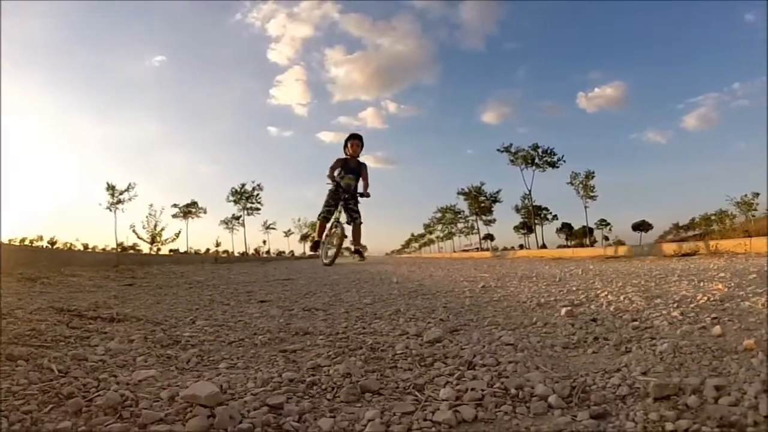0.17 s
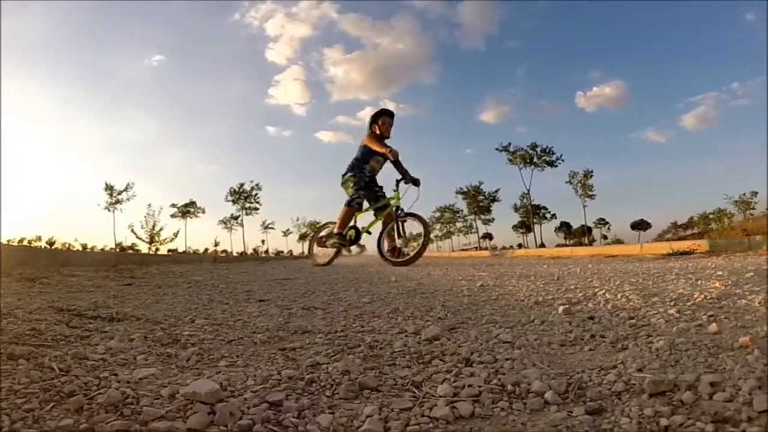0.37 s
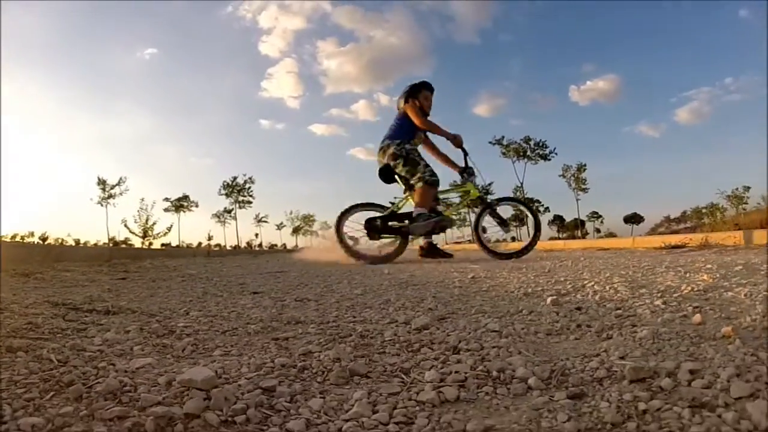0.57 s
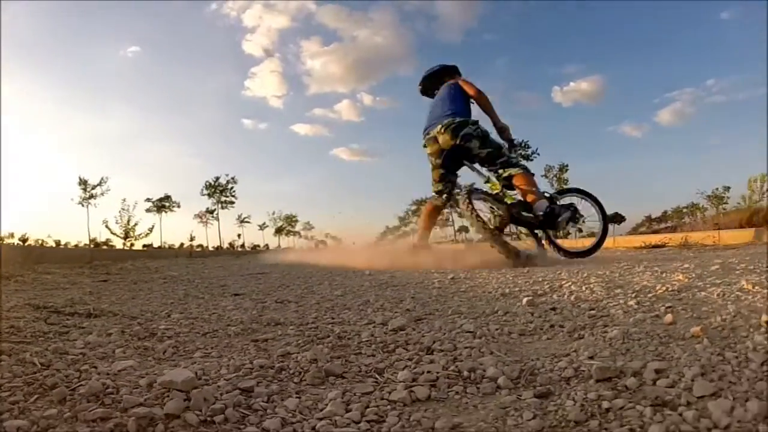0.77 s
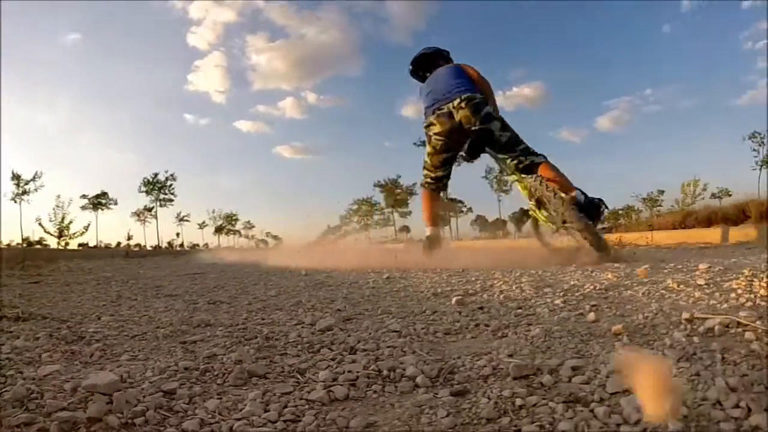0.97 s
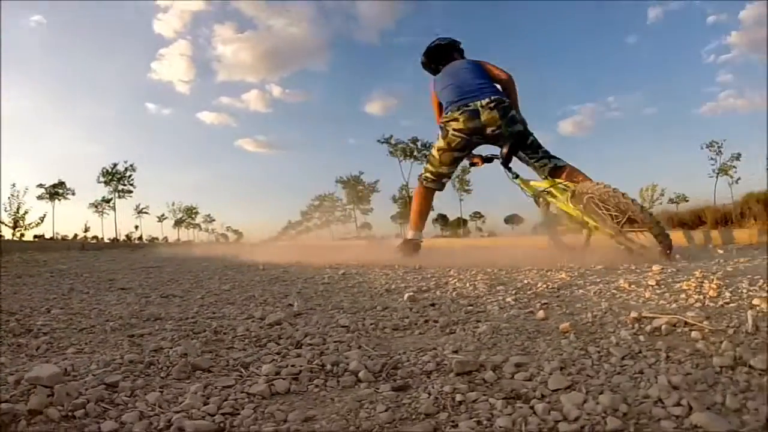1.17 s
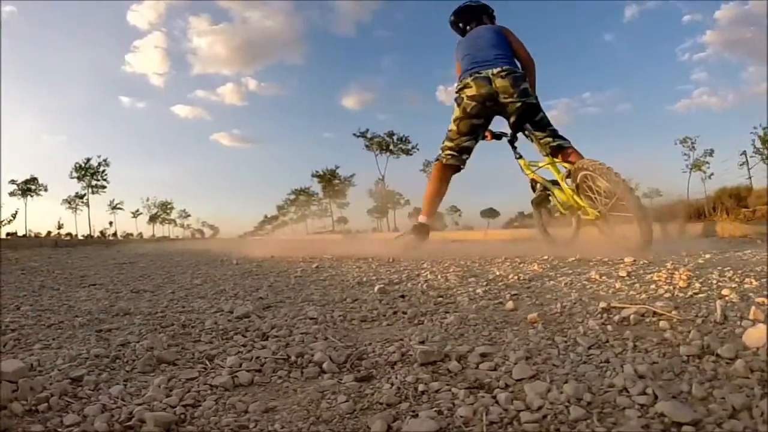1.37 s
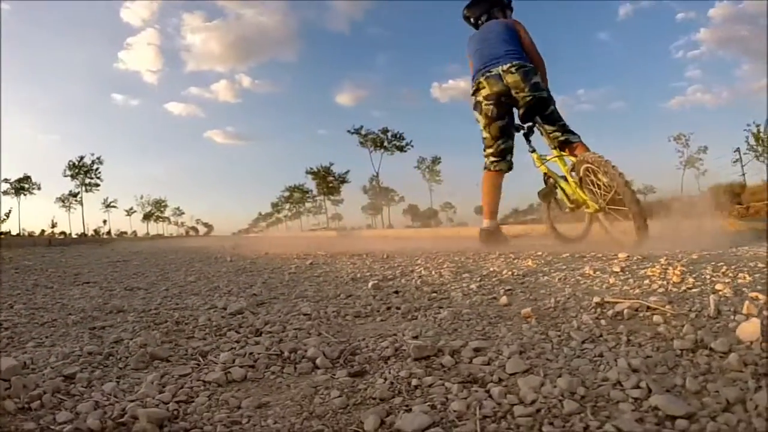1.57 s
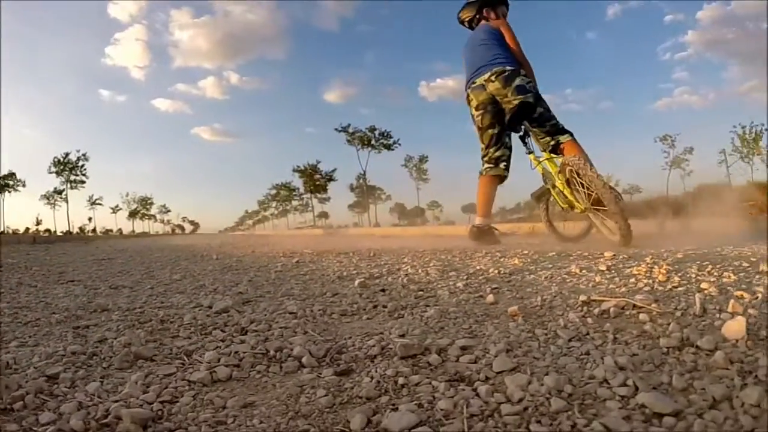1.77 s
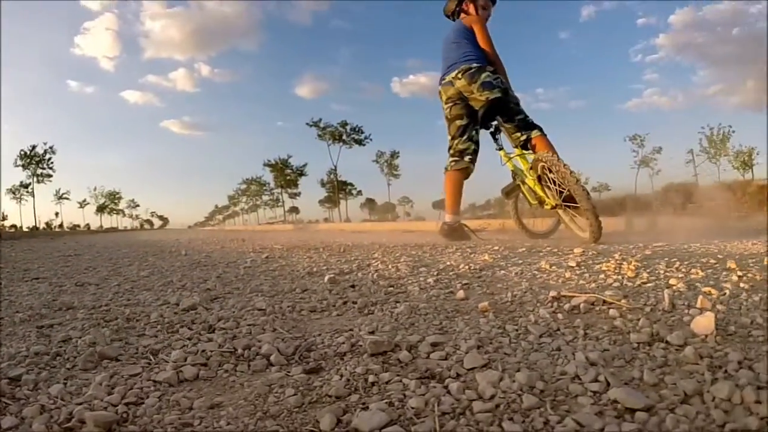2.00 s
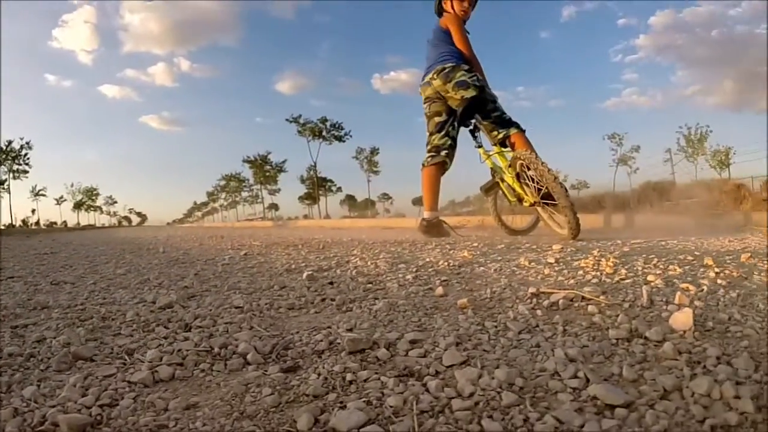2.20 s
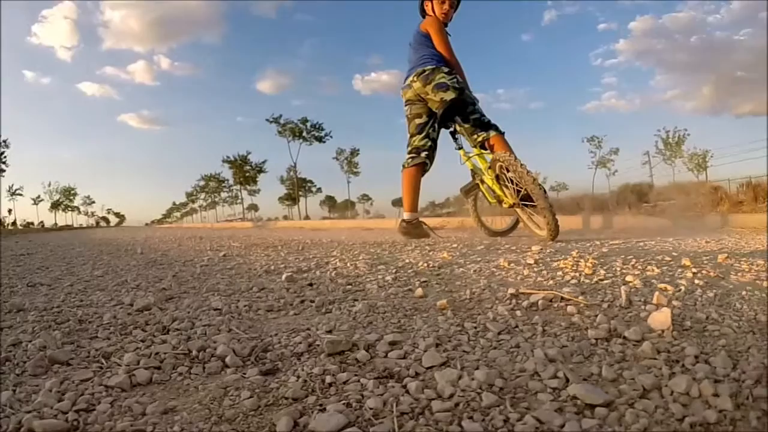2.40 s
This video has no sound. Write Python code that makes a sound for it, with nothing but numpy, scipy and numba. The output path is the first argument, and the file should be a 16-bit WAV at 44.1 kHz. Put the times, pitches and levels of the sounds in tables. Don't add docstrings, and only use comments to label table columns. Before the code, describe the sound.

A bicycle's rear tyre slides across loose gravel outdoors, with a dense, surging crunch of stones and grit; two stones crack against the boxed microphone on the ground, then sparse pebbles settle over low wind.

```python
import sys
import numpy as np
from scipy import signal
from scipy.fft import rfft, irfft
from scipy.io import wavfile
from scipy.ndimage import uniform_filter1d
from numba import njit

SR = 44100
rng = np.random.default_rng(int(sys.argv[2]) if len(sys.argv) > 2 else 0)


def to_wav(sig):
    pcm = np.clip(np.atleast_2d(sig), -1, 1) * 32767
    pcm = np.round(pcm).astype(np.int16)
    wavfile.write(sys.argv[1], SR, pcm.T)


def boost(x):
    u = np.asarray(x, float) / 20
    return 10 ** u


N = 108045


def unit(x):
    return x / np.sqrt(np.mean(x ** 2))


def colour(x, points):
    hz, db = np.array(points, float).T
    grid_hz = np.maximum(np.fft.rfftfreq(8192, 1 / SR), 1)
    cepstrum = irfft(np.log(boost(np.interp(np.log(grid_hz), np.log(hz), db))))
    cepstrum[1:4096] *= 2
    cepstrum[4097:] = 0
    impulse = irfft(np.exp(rfft(cepstrum)))[:4096]
    return signal.fftconvolve(x, impulse)[:len(x)]


def ring(x, hz, width_hz):
    return signal.lfilter(*signal.iirpeak(hz, hz / width_hz, fs=SR), x)


def high_pass(x, order, hz):
    return signal.sosfilt(signal.butter(order, hz, "high", fs=SR, output="sos"), x)


@njit
def grains(n, start, turn, fade, size):
    out = np.zeros(n)
    for k in range(len(start)):
        z, p, i = size[k] + 0j, fade[k] * np.exp(1j * turn[k]), start[k]
        while i < n and abs(z) > .003 * abs(size[k]):
            out[i] += z.imag
            z *= p
            i += 1
    return out


def knocks(start_s, hz, cycles, size):
    first = (start_s * SR).astype(np.int64)
    return grains(N, first, 2 * np.pi * hz / SR, np.exp(-hz / cycles / SR), 1. * size)


def shower(busy, per_s, lo_hz, hi_hz, cycles, spread_db):
    most = 12000
    place, pitch, luck, sign, chance = rng.random((most, 5)).T
    share = busy[(place * N).astype(int)]
    hz = lo_hz * (hi_hz / lo_hz) ** pitch
    size = boost(-spread_db * np.log(luck + .02)) * np.sign(sign - .5)
    size = size * (np.arange(most) < per_s * N / SR)
    size = size * (chance < share) / np.sqrt(share)
    return unit(knocks(place * N / SR, hz, cycles, size))


def walk(rate_hz):
    k = int(SR / rate_hz)
    return unit(uniform_filter1d(uniform_filter1d(rng.standard_normal(N), k), k))


# pitch in Hz, width in Hz, level in dB.
CASE_RESONANCES = [(321.4, 97, -5.5), (597, 88, 1), (782, 130, 0), (1015, 87, 2.5), (1254, 74, -4.5),
                   (2027, 520, -8), (2951, 176, -4.5), (4050, 576, -27), (5400, 770, -36)]
# frequency in Hz, gain in dB.
CASE_LEAK = [(100, -21), (250, -19), (3000, -27), (5000, -36.5), (7000, -58), (10000, -44), (14000, -51.5)]


def through_case(x):
    out = colour(x, CASE_LEAK)
    for k, (hz, width_hz, db) in enumerate(CASE_RESONANCES):
        out = out + (-1) ** k * boost(db) * ring(x, hz, width_hz)
    return out


# peak in seconds, stone surge in dB, grit surge in dB, fade in seconds.
CRUNCHES = [(0.097, -6, 2.5, 0.005), (0.153, 4.5, 1, 0.011), (0.246, 7.5, 12.5, 0.014),
            (.289, 4, 10.5, 0.013), (.313, 4, 2.5, 0.013), (0.356, 4, 7.5, .015), (0.377, 5, 1, 0.014),
            (0.423, 4.5, 1.5, 0.011), (0.446, 8, 3.5, 0.021), (.495, 4.5, 6.5, 0.0088),
            (0.531, -2.5, 5, 0.02), (.558, 4.5, 1.5, 0.0068), (.581, 8, 3.5, 0.016), (0.6, 3.5, 4, 0.02),
            (.634, 10, 5, 0.013), (.664, -9, 3, 0.0072), (0.687, 3, 7.5, 0.014), (0.72, -1, 5, 0.0075),
            (0.73, 6.5, 1.5, 0.022), (0.773, 3, 4.5, 0.0091), (0.781, 8, 2, 0.0082),
            (0.808, -0.5, 6.5, .008), (0.816, 3, 0, 0.013), (0.901, -2, 5.5, .01), (0.913, 6, 3.5, 0.013),
            (1, 4, -6, 0.0062), (1.032, 3, 0.5, 0.022), (1.107, 5, -4, .01), (1.136, 9, 2, 0.0093),
            (1.149, 7, 5.5, 0.01), (1.203, 0, 4, 0.0071), (1.278, 5, 6.5, .012), (1.353, 7, 8, .01),
            (1.403, 5, 9, .008), (1.413, 8.5, 13, 0.011), (1.4194, 19.5, 13, .012), (1.468, 5, 7.5, 0.0057),
            (1.536, 3, 10.5, 0.018), (1.583, 6.5, 2.5, 0.0085), (1.607, 6, -1, .01),
            (1.633, 4, 8.5, 0.0093), (1.647, 11, 3, 0.014), (1.677, -7, 8, .015), (1.703, 2, 9, 0.0065),
            (1.722, 13, 9, 0.04), (1.765, 3, 9, .015), (1.795, 2, 10, .01)]


def surge(t, column):
    rise_s, lift_db = .002, 0
    for crunch in CRUNCHES:
        since_s = t - crunch[0]
        rise = np.clip(since_s / rise_s + 1, 0, 1)
        lift_db = lift_db + crunch[column] * rise * np.exp(-np.clip(since_s, 0, None) / crunch[3])
    return lift_db


# time in seconds, level in dB, grit share in dB, tyre weight in dB,
# sand spray in dB.
SKID = [(0, -38.5, 4, -17, 6), (.19, -38, 4, 7.5, 4), (.245, -27, -8.5, -2, -17), (0.332, -27.5, 3.5, 8, 1),
        (0.388, -18, 0, 3, -1.5), (.55, -18, 6.5, 2, 6.5), (.7, -14, 0, 5, 2), (0.828, -21, 4.5, 8, 8.5),
        (0.923, -23, -4, 4.5, 4.5), (0.943, -45, 17, -15, -3), (0.981, -29, -1, 2.5, 6),
        (1.23, -37, 6, -5, 10.5), (1.3, -53, 7.5, -6.5, 16.5), (1.49, -68, -0.5, 11.5, 16.5),
        (1.529, -50, -1, -10.5, 10.5), (1.655, -40.5, 3.5, 2, 13), (1.72, -50, 5, 10, 13),
        (1.82, -65, -0.5, 0, 14)]
# frequency in Hz, gain in dB.
SAND_COLOUR = [(2200, -21.5), (3300, 1.5), (4150, -7), (4500, -16), (5200, -10.5), (7000, -21.5),
               (10000, -32.5)]


def skid(t):
    rows = np.array(SKID, float)
    level_db, grit_db, weight_db, spray_db = (np.interp(t, rows[:, 0], col) for col in rows.T[1:])
    end_s, end_db = rows[-1, :2]
    level_db = np.where(t > end_s, end_db - 60 * (t - end_s), level_db)
    sparse_below_db, sparse_slope, slide_ends_s = -26, .6, 1.2
    fewest = np.where(t < slide_ends_s, .5, .4)
    busy = np.clip(boost(sparse_slope * (level_db - sparse_below_db)), fewest, 1)
    stone_surge_db, grit_surge_db = surge(t, column=1), surge(t, column=2)

    stones = shower(busy, 1600, lo_hz=472.4, hi_hz=1500, cycles=0.93, spread_db=1.5)
    grit = shower(busy, 2500, lo_hz=1500, hi_hz=14200, cycles=0.33, spread_db=1.3)
    thud = shower(busy, 300, lo_hz=200, hi_hz=450, cycles=0.28, spread_db=4.5)
    ground = ring(shower(busy, 90, lo_hz=90, hi_hz=180, cycles=.75, spread_db=2), 130, 110)
    sand = colour(shower(busy, 3000, lo_hz=3000, hi_hz=15000, cycles=.45, spread_db=3.0), SAND_COLOUR)
    hiss = colour(rng.standard_normal(N), [(4000, -19.0), (8000, 4.5), (15000, -0.5)])

    body = boost(stone_surge_db) * unit(through_case(stones))
    body = body + boost(-4.5 + grit_db + grit_surge_db) * unit(through_case(grit))
    body = body + boost(-10.5 + weight_db + stone_surge_db / 2) * unit(through_case(thud))
    body = body + boost(-19 + weight_db) * ground
    body = body + boost(-26.5 + spray_db + grit_surge_db) * unit(sand)
    body = body + boost(-45.5 + weight_db + grit_surge_db) * hiss
    settle_db, wander_db = -2.5, 0.45
    return high_pass(body * boost(level_db + settle_db + wander_db * walk(45)), 3, 85)


# landing in seconds, peak in dB, pitch in Hz, brightness in dB.
PEBBLES = [(.0275, -24, 930, -14.5), (.0508, -20.5, 950, 3), (.2006, -5.5, 1020, -15),
           (.2293, -5, 825, -17), (.4955, 0, 880, -14), (.559, -2, 726, -2), (.8815, 3, 794, -33),
           (1.151, -14, 780, -11), (1.2158, -11, 670, -16), (1.2945, -24.5, 829, -13),
           (1.3185, -22.5, 635, -21), (1.3385, -31, 656, -24), (1.393, -39, 568, -8),
           (1.4245, -36, 450, -10), (1.5128, -21, 680, -22), (1.585, -34, 641, -12),
           (1.6315, -24, 824, -16), (1.6535, -16, 770, -27), (1.7225, -26.5, 674, -10),
           (2.0175, -29.5, 1000, -22), (2.1815, -34, 617, -24), (2.3205, -33, 720, -8),
           (2.358, -33, 563, -17)]


def pebbles():
    start_s, peak_db, hz, bright_db = np.array(PEBBLES, float).T
    lag_s = 0.0033 + 0.0012 * rng.random(len(start_s))
    low = knocks(start_s, hz, 0.53, boost(peak_db))
    bounce = knocks(start_s + lag_s, 0.93 * hz, 1.1, boost(peak_db - 13))
    tick = boost(17.5) * knocks(start_s, 0 * start_s + 1900, 0.84, boost(peak_db + bright_db))
    scatter_db, scatter_s = -22, .008
    puff = knocks(start_s, 0 * start_s + 30, 30 * scatter_s, boost(peak_db + scatter_db + 20))
    scatter = 2 * ring(rng.standard_normal(N) * puff, 1200, 2200)
    direct = boost(3) * ring(ring(low, 1100, 1400), 1100, 1400)
    return direct + boost(-5.0) * through_case(low + bounce + tick + scatter)


# start in seconds, peak in dB, pitch in Hz, width in Hz.
CHIPS = [(0.189, -38, 3000, 2500), (0.871, -31, 5000, 4000), (0.966, -38, 4700, 3000),
         (1.043, -49, 4800, 2000), (1.152, -42, 5200, 5050), (1.332, -55, 5000, 5050),
         (1.394, -42, 2630, 1290), (1.405, -51.5, 9900, 6000), (1.428, -51, 5940, 4980),
         (1.535, -47, 3480, 3000), (1.704, -41, 3500, 3000), (2.018, -46.5, 3000, 2500),
         (2.235, -49, 2700, 1200), (2.313, -47.5, 2880, 1500), (2.335, -45, 3160, 1500),
         (2.358, -47, 2940, 1500), (2.397, -48.5, 4300, 1500)]


def chips():
    out, fade_s = np.zeros(N), .0015
    for start_s, peak_db, hz, width_hz in CHIPS:
        chip = rng.standard_normal(400) * np.exp(-np.arange(400) / SR / fade_s)
        for _ in range(3):
            chip = ring(chip, hz, width_hz)
        i = int(start_s * SR)
        out[i:i + len(chip)] += boost(peak_db) * chip / np.abs(chip).max()
    return out


# start in seconds, crack in dB, rattle in seconds, ring delay in seconds,
# rise in seconds.
STRIKES = [
    (0.933, -11.5, 0.0022, 0.0013, 0.00038),
    (1.0555, -12.5, 0.0022, .0012, .0001),
]
# frequency in Hz, gain in dB.
CRACK_COLOURS = [
    [(700, 6), (2000, -4), (5000, 8), (8000, -3.5), (13000, -24), (16000, -42)],
    [(500, -12), (2000, -2), (4500, 1.5), (8000, -12.5), (13000, -11), (16000, -26)],
]
# pitch in Hz, level in dB, 60 dB decay in seconds.
CASE_MODES = [
    [(1205, -6, 0.013), (1500, 10.5, 0.004), (1830, -24.5, 0.11), (2010, -28.5, .08), (2360, 4.5, 0.0077),
     (2740, 1, 0.0099), (4400, -24, 0.0096), (5200, -19, 0.0025), (6900, -23, .004)],
    [(770, -12.5, 0.02), (1020, -15, 0.0067), (1710, -25, 0.019), (3090, -6.5, 0.009), (3970, -13.5, 0.011),
     (4860, -26, 0.03)],
]


def strikes(t):
    out = 0
    for (start_s, crack_db, rattle_s, late_s, rise_s), shade, modes in zip(STRIKES, CRACK_COLOURS, CASE_MODES):
        since_s = np.clip(t - start_s, 0, None)
        env = np.minimum(since_s / rise_s, 1) * np.exp(-np.clip(since_s - rattle_s, 0, None) / 0.00047)
        crack = colour(env * rng.standard_normal(N), shade)
        crack = crack * np.sqrt(rattle_s * SR / np.sum(crack ** 2))
        hz, db, t60_s = np.array(modes, float).T
        rings = knocks(0 * hz + start_s + late_s, hz, hz * t60_s / np.log(1000), boost(db))
        out = out + boost(crack_db) * crack + uniform_filter1d(rings, size=5)
    return high_pass(out, 2, 450)


# start in seconds, peak in dB, pitch in Hz, length in cycles.
BUMPS = [
    (.31, -35, 111, 1.3),
    (0.369, -26, 97, 2.4),
    (0.809, -22, 127, 1.8),
    (1.055, -38, 70, 1.1),
    (1.15, -32, 147, 1.5),
    (1.87, -46, 64.6, 1.5),
    (2.18, -36, 58, 1.1),
    (2.285, -36, 64.3, 1.7),
]


def bumps():
    start_s, peak_db, hz, cycles = np.array(BUMPS, float).T
    return uniform_filter1d(knocks(start_s, hz, cycles, boost(peak_db)), size=150)


# time in seconds, level in dB.
GUSTS = [(0, -53), (.3, -53.5), (.4, -51), (.9, -54), (.97, -51), (1.3, -66), (1.6, -57.5), (1.95, -56),
         (2.1, -52.5), (2.45, -48.5)]
# frequency in Hz, gain in dB.
WIND_COLOUR = [(20, 0.5), (50, -4), (90, -4), (200, -11.5), (400, -27.5), (1000, -59)]


def wind(t):
    gust_db = np.interp(t, *np.array(GUSTS, float).T) + 5 + 3 * walk(22)
    return unit(colour(rng.standard_normal(N), WIND_COLOUR)) * boost(gust_db)


# frequency in Hz, gain in dB.
AIR_COLOUR = [(88, -27.5), (150, -4), (312, -11), (441, -5.5), (624, -8), (687, -4), (1230, -18),
              (2860, -26), (15000, -44)]


def far_air(t):
    duck_s, duck_db, hold_s, recover_db_per_s = 0.81, -8, 0.51, 10
    recovery_db = recover_db_per_s * np.clip(t - duck_s - hold_s, 0, None)
    gain_db = np.where(t > duck_s, np.minimum(duck_db + recovery_db, 0), 0)
    level_db = -51.5 + 0.5 * walk(25) + uniform_filter1d(gain_db, size=88)
    return unit(colour(rng.standard_normal(N), AIR_COLOUR)) * boost(level_db)


def scene():
    t = np.arange(N) / SR
    gravel = skid(t) + pebbles() + chips()
    return (gravel + strikes(t) + bumps() + wind(t) + far_air(t))[None]


def roll_off(x):
    return signal.sosfilt(signal.butter(12, 16480, fs=SR, output="sos"), x)


def record(dry):
    ceiling = .9
    drive = dry / ceiling
    rounded = np.tanh(drive ** 3 / 3 + drive) * ceiling
    heard = signal.sosfilt(signal.cheby2(10, 45, 15800, fs=SR, output="sos"), rounded)
    return roll_off(heard)


dry = scene()
out = record(dry)
to_wav(out)
```